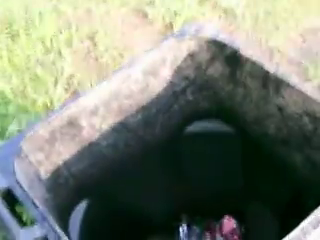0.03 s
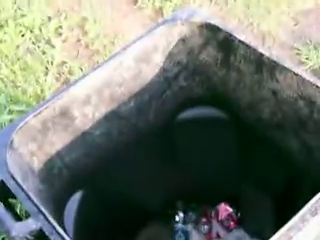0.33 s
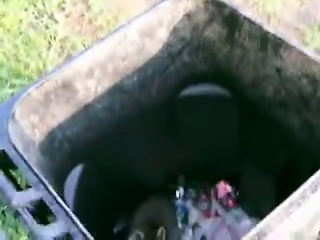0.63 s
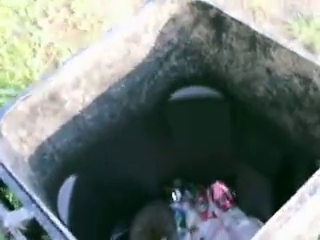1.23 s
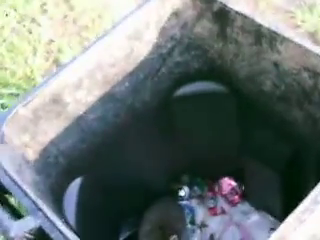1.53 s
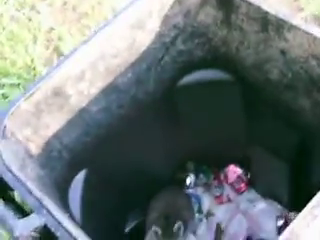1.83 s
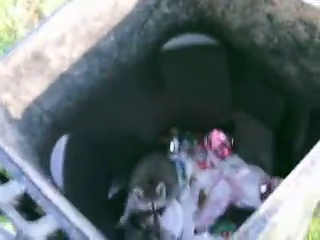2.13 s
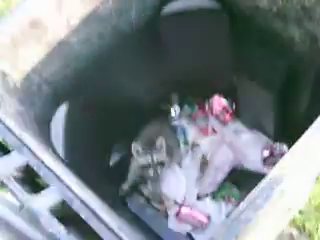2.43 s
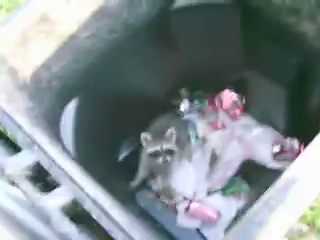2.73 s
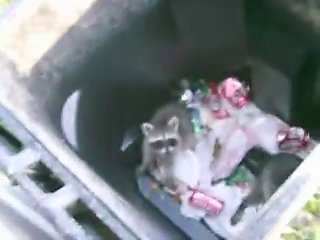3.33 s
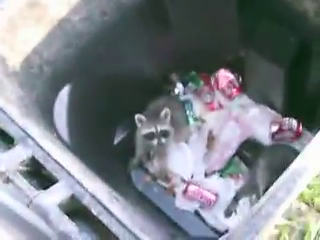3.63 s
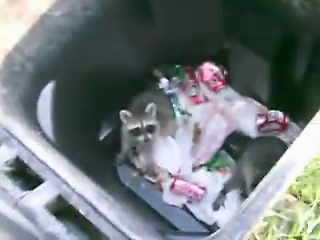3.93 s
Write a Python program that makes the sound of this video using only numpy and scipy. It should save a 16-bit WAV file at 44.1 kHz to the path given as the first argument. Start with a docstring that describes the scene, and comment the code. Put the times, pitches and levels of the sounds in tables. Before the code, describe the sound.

Close, slightly muffled knocks, clicks and rustles come from a raccoon shifting cans and plastic bags, with a short hollow bin echo. After a lull of faint scratching they pick up again. Outdoor hiss and a faint hum continue underneath.

```python
"""Outdoors at a large rubbish bin, with one narrow-band microphone on the raccoons at its bottom.
Close by, paws scratch, cans and containers knock and ring, bags crinkle and thin plastic snaps.
The bin's walls answer the knocks and snaps with a short hollow echo. Behind it all lie a soft
outdoor hiss and the hum of a distant motor. The loudest knocks clip the input on one side."""
import sys
import numpy as np
from scipy import signal
from scipy.fft import rfft, irfft, next_fast_len
from scipy.io import wavfile

SR = 44100
rng = np.random.default_rng(int(sys.argv[2]) if len(sys.argv) > 2 else 0)


def to_wav(s):
    """Save 16-bit WAV."""
    ch = np.atleast_2d(s).T  # columns
    pcm = np.round(np.clip(ch, -1, 1) * 32767)  # PCM
    wavfile.write(sys.argv[1], SR, pcm.astype(np.int16))


N = 176400
TIME = np.arange(N) / SR
AGE = TIME[:SR // 4]   # seconds since a strike
MIC_TOP_HZ = 4300

# Spectrum of the open air: frequency_hz, relative_db
AIR_SPECTRUM = [(20, -0.5), (42, -2), (60, 9), (80, 5), (140, 0), (350, -3), (490, -8), (780, -4),
                (1100, -5.5), (1400, -17.5), (1850, -20), (2300, -19.5), (3100, -18), (3800, -21.5),
                (4300, -39)]
# Tones of the distant motor, before its swell: pitch_hz, level_db
MOTOR_TONES = [(113, -54.5), (231.6, -40.5), (290, -54), (353, -52), (404.5, -55), (452, -62),
               (521.5, -59.5), (587, -55), (645.5, -55.5), (753.5, -55), (1820, -68), (1879, -63)]
# Slow swell of the whole hum: time_s, gain_db
MOTOR_SWELL = [(0, -1.5), (.8, 0), (1.6, -0.5), (2.4, 0.5), (3.2, 1.5), (4, 1)]
# Faint scratching in the bin: time_s, level_db
PAW_LEVEL = [(0, -48), (.5, -54), (1.0, -63), (1.8, -58), (2.5, -59), (3.2, -53.5), (4, -59.5)]
# Spectrum of crinkling bags and scratching paws: frequency_hz, relative_db
CRINKLE_SPECTRUM = [(300, -8), (900, 2.5), (1400, 4), (1800, 4.5), (2200, 0), (2700, 0.5), (3100, -0.5),
                    (3600, 3.5), (4300, -9.5)]
# Knocks on cans and containers, each part's level before its own trim:
# start_s, ring_db, ring_hz, ring_t60_s, contact_s, crack_db, thud_db, thud_hz, echo_send_db
KNOCKS = [(0.0433, -2.5, 1135, 0.012, 0.00031, -3.5, -9.5, 605, -6.5),
          (0.0977, -16, 910, 0.0088, 0.00071, -31, -26.5, 493, 2.5),
          (.157, -20, 950, 0.028, 0.00044, -34, -36, 522, 0),
          (.177, -19, 835, 0.018, 0.00073, -23, -51, 409, -6),
          (.2232, -11.5, 1019, 0.022, 0.0014, -16.5, -37, 540, -10),
          (.435, -30.5, 1000, 0.029, .001, -39, -40, 400, -1),
          (.496, -23.5, 1050, 0.027, 0.00079, -26, -41, 380, -3.5),
          (.648, -28.5, 1047, 0.028, .001, -35, -41, 405, -3),
          (.695, -14, 807, 0.0049, 0.0011, -27, -28, 350, -6.5),
          (0.7846, -25, 915, .016, .0005, -34, -55, 404, -9),
          (.855, -18.5, 1020, 0.04, 0.00034, -32.5, -25, 400, -5),
          (0.8591, -18, 844, 0.029, 0.00069, -39.5, -48, 400, -9.5),
          (1.004, -24, 980, 0.022, 0.00044, -27.5, -43, 400, -2),
          (1.2632, -11.5, 830, 0.0053, 0.001, -32.5, -18.5, 326, 3),
          (1.386, -16, 800, 0.011, 0.0006, -22, -33.5, 666, -23),
          (1.6058, -21.5, 556, .018, .0008, -34.5, -39, 414, -12.5),
          (2.6645, -9, 988, 0.047, 0.0028, -28.5, -29, 372, -4.5),
          (2.79, -11, 904, 0.01, 0.00058, -30, -25.5, 335, -4.5),
          (2.8639, -5, 917.6, 0.023, 0.0055, -20, -16, 317, -10),
          (2.998, -14, 817, 0.02, 0.0017, -34, -21.5, 362, -12),
          (3.0842, -5.5, 1109, 0.018, 0.003, -16.5, -12.5, 423, -5.5),
          (3.1433, -19, 1008, 0.021, .0005, -26.5, -24.5, 370, 3.5),
          (3.7255, -22, 670, 0.0085, 0.00049, -22, -20, 330, -21),
          (3.7351, -19, 1055, .015, 0.00075, -20.5, -23.5, 330, -4)]
# Modes of a knocked container: pitch_ratio, relative_db
CONTAINER_MODES = [(1, -4), (.76, -9.5), (1.22, -14.5)]
# Spectrum of the crack in a knock or snap: frequency_hz, relative_db
CRACK_SPECTRUM = [(300, -12.5), (1000, -8), (1700, 4), (2300, -4), (3000, 3), (4300, -11)]
# Pushes and pulls on a bag: start_s, rise_s, fall_s, crinkle_db, shifting_db, sheet_hz
BAG_PUSHES = [(.045, 0.02, 0.075, -41, -43.5, 3300), (0.164, 0.057, 0.073, -41.5, -33.5, 2680),
              (0.476, 0.02, 0.042, -46.5, -32, 3340), (.61, 0.062, 0.086, -53.5, -45.5, 2830),
              (.815, 0.011, 0.084, -45, -37.5, 2240), (2.25, .18, .1, -49.5, -37.5, 2600),
              (2.646, 0.014, 0.04, -48.5, -32, 3270), (2.72, 0.03, 0.17, -45.5, -32.5, 2900),
              (2.853, 0.018, 0.022, -38.5, -21, 2560), (2.995, 0.048, 0.06, -29.5, -23, 2560),
              (3.06, 0.029, 0.072, -38, -26.5, 1400), (3.713, 0.026, 0.044, -37, -35.5, 3490),
              (3.772, .025, 0.031, -33, -48, 2620), (3.812, 0.026, 0.027, -34, -60, 3620),
              (3.907, 0.014, 0.024, -35, -45, 2790), (3.929, 0.061, .08, -41, -40, 2660)]
# Spectrum of rubbish shifting under a bag: frequency_hz, relative_db
SHIFTING_SPECTRUM = [(60, -5.5), (150, 4), (400, 1), (550, -6), (800, 7), (1100, -1.5), (1450, -14),
                     (2500, -18), (4300, -58)]
# Snaps of thin plastic: start_s, level_db, pitch_hz, t60_s
SNAPS = [(0.0459, -12.5, 2860, 0.0073), (0.0963, -24, 2450, 0.015), (.1775, -30.5, 3570, 0.02),
         (0.1946, -21.5, 2090, 0.024), (.207, -32.5, 2300, .015), (.2238, -22.5, 2870, 0.0069),
         (0.8194, -20, 2035, 0.011), (.985, -32, 2950, 0.0061), (1.387, -18.5, 1770, 0.011),
         (1.3878, -17.5, 2956, .009), (1.553, -37.5, 2800, .03), (2.134, -26, 2900, 0.002),
         (2.667, -25, 3650, 0.0073), (2.791, -14, 1580, 0.0074), (3.045, -22.5, 2550, 0.016),
         (3.092, -20, 2920, .016), (3.124, -31.5, 3050, 0.025), (3.241, -31, 3650, 0.011),
         (3.294, -34.5, 2650, .015), (3.3904, -29, 2233, 0.0041), (3.494, -38, 2930, 0.044),
         (3.558, -35, 3200, 0.012), (3.701, -35.5, 3390, 0.012), (3.916, -30, 3180, .012)]
# First reflections off the bin's walls: delay_s, gain
WALL_REFLECTIONS = [(.0046, 0.45), (.0071, -0.053), (0.0113, 0.3)]
# Spectrum of the bin's hollow tail: frequency_hz, relative_db
BIN_SPECTRUM = [(100, -19), (300, 3), (1100, 5.5), (1700, -5), (4300, -9)]


def from_db(db):
    """Decibels to gain."""
    return 10 ** (np.asarray(db) / 20)


def rms_one(x):
    """Scale to an rms of 1."""
    return x / np.sqrt(np.mean(x ** 2) + 1e-20)


def level_curve(rows):
    """Gain over time from rows of time_s, level_db."""
    return from_db(np.interp(TIME, *np.transpose(rows)))


def colour(x, spectrum):
    """Minimum-phase filter that follows a spectrum and rolls off above the microphone's band."""
    size = next_fast_len(2 * len(x))
    hz, db = np.transpose(spectrum)
    grid_hz = np.fft.rfftfreq(size, 1 / SR) + 1
    gain = from_db(np.interp(np.log(grid_hz), np.log(hz), db))
    gain /= 1 + (grid_hz / MIC_TOP_HZ / 2) ** 4
    cepstrum = irfft(np.log(gain), size)
    cepstrum[1:size // 2] *= 2   # folded forward, so nothing sounds ahead of a click
    cepstrum[size // 2 + 1:] = 0
    return irfft(rfft(x, size) * np.exp(rfft(cepstrum)), size)[:len(x)]


def noise(spectrum, size):
    """Coloured noise of rms 1."""
    return rms_one(colour(rng.standard_normal(size), spectrum))


def drift(rate_hz):
    """Slow random wander of rms 1."""
    pole = np.exp(-2 * np.pi * rate_hz / SR)
    wander = signal.lfilter([1], [1, -2 * pole, pole * pole], rng.standard_normal(N + SR))
    return rms_one(wander[SR:])


def grains(spectrum, per_s, spread_db):
    """Coloured random clicks of uneven size, rms 1."""
    sizes = from_db(spread_db * np.minimum(rng.exponential(1, N), 4))
    signs = rng.choice([-1, 1], N)
    fires = rng.random(N) < per_s / SR
    return rms_one(colour(sizes * signs * fires, spectrum))


def envelope(rise_s, t60_s):
    """A quick rise and an exponential decay, peak 1."""
    shape = (1 - np.exp(-(AGE / rise_s) ** 2)) * from_db(-60 * AGE / t60_s)
    return shape / shape.max()


def ring(hz, rise_s, t60_s):
    """One struck mode."""
    return np.sin(2 * np.pi * hz * AGE) * envelope(rise_s, t60_s)


def crack(rise_s, t60_s):
    """The burst of noise in a knock or snap."""
    return noise(CRACK_SPECTRUM, len(AGE)) * envelope(rise_s, t60_s)


def add(track, start_s, sound):
    """Mix a sound into a track at start_s."""
    part = track[max(int(start_s * SR), 0):][:len(sound)]
    part += sound[:len(part)]


def outdoor_hiss(level_db=-40, flicker_db=0.08):
    """The open air around the bin: a soft, almost steady hiss."""
    return from_db(level_db + flicker_db * drift(rate_hz=2.7)) * noise(AIR_SPECTRUM, N)


def distant_motor(waver_db=1.5, waver_hz=0.88):
    """A motor hums far off, each tone wavering slightly in level and pitch."""
    hum = np.zeros(N)
    for pitch_hz, level_db in MOTOR_TONES:
        amplitude = np.sqrt(2) * from_db(level_db + waver_db * drift(rate_hz=4.9))
        cycles = np.cumsum(pitch_hz + waver_hz * drift(rate_hz=3.88)) / SR
        hum += amplitude * np.sin(2 * np.pi * cycles)
    return level_curve(MOTOR_SWELL) * hum


def paw_scratches():
    """Paws scratch at the bottom of the bin in a faint run of ticks."""
    return level_curve(PAW_LEVEL) * grains(CRINKLE_SPECTRUM, per_s=130, spread_db=1)


def container_knocks(crack_trim_db=-7.5, floor_trim_db=-26, heavy_contact_s=0.0027):
    """Struck rubbish rings, cracks and thuds; returns the direct sound and what reaches the walls."""
    direct, to_walls = np.zeros((2, N))
    for start_s, ring_db, ring_hz, t60_s, contact_s, crack_db, thud_db, thud_hz, send_db in KNOCKS:
        hit = np.zeros(len(AGE))
        for sign, (ratio, mode_db) in zip((1, 1, -1), CONTAINER_MODES):
            hit += sign * from_db(ring_db + mode_db) * ring(ring_hz * ratio, contact_s, t60_s)
        hit += from_db(crack_db + crack_trim_db) * crack(contact_s, 1.3 * t60_s)
        hit += from_db(thud_db) * ring(thud_hz, contact_s, t60_s=0.012)
        # The bin floor booms under long, heavy contacts.
        boom_gain = from_db(ring_db + floor_trim_db) * contact_s / heavy_contact_s
        hit += boom_gain * ring(hz=141.8, rise_s=contact_s, t60_s=0.1)
        add(direct, start_s, hit)
        add(to_walls, start_s, from_db(send_db) * hit)
    return direct, to_walls


def bag_rustles(sheet_db=-9.5, sheet_width_hz=80):
    """A pushed bag crinkles, its flexing sheet rings at one pitch and the rubbish under it shifts."""
    crinkle = grains(CRINKLE_SPECTRUM, per_s=1200, spread_db=-4.5)
    shifting = grains(SHIFTING_SPECTRUM, per_s=1200, spread_db=-4.5)
    out = np.zeros(N)
    for start_s, rise_s, fall_s, crinkle_db, shifting_db, sheet_hz in BAG_PUSHES:
        push = np.interp(TIME, [start_s, start_s + rise_s, start_s + rise_s + fall_s], [0, 1, 0])
        resonance = signal.iirpeak(sheet_hz, sheet_hz / sheet_width_hz, fs=SR)
        sheet = rms_one(signal.lfilter(*resonance, crinkle))
        bag = rms_one(crinkle + from_db(sheet_db) * sheet)
        out += push * (from_db(crinkle_db) * bag + from_db(shifting_db) * shifting)
    return out


def plastic_snaps(rise_s=0.00013, crack_db=-15.5):
    """A crease in thin plastic pops over and rings briefly at a high pitch."""
    out = np.zeros(N)
    for start_s, level_db, pitch_hz, t60_s in SNAPS:
        snap = ring(pitch_hz, rise_s, t60_s) + from_db(crack_db) * crack(rise_s, t60_s)
        add(out, start_s, from_db(level_db) * snap)
    return out


def bin_echo(x, tail_db=-4):
    """The bin's close walls return a few reflections, then a short diffuse tail."""
    tail = noise(BIN_SPECTRUM, len(AGE)) * envelope(rise_s=0.0027, t60_s=0.13)
    in_band_gain = np.sqrt(np.sum(tail ** 2) * SR / MIC_TOP_HZ)
    response = from_db(tail_db) * tail / in_band_gain
    for delay_s, gain in WALL_REFLECTIONS:
        response[int(delay_s * SR)] += gain
    return signal.fftconvolve(x, response)[:N]


def low_pass(x, hz):
    """Steep treble cut."""
    taps = signal.firwin(201, hz, window=("kaiser", 7), fs=SR)
    return signal.fftconvolve(x, taps[None], mode="same")


def scene(snap_send_db=-14.5):
    """What reaches the microphone, in mono: the bin in front, air and motor behind."""
    behind = outdoor_hiss() + distant_motor()
    scratches = paw_scratches()
    knocks, knocks_to_walls = container_knocks()
    rustles = bag_rustles()
    snaps = plastic_snaps()
    echo = bin_echo(knocks_to_walls + from_db(snap_send_db) * snaps)
    return (behind + scratches + knocks + rustles + snaps + echo)[None]


def record(dry, offset=-0.242, clip_level=0.713):
    """A narrow-band microphone into an off-centre input: loud knocks clip on one side, thin and bright."""
    microphone = low_pass(dry, MIC_TOP_HZ)
    swing = np.clip(microphone + offset, -clip_level, clip_level) - offset
    return offset + low_pass(swing, hz=16000)


dry = scene()
out = record(dry)
to_wav(out)
```